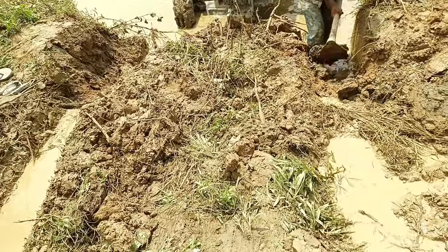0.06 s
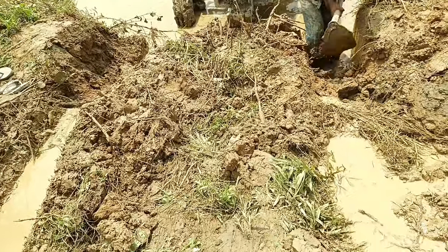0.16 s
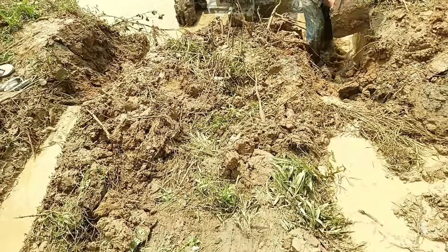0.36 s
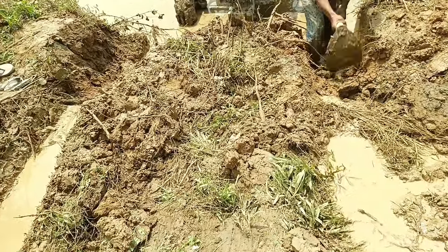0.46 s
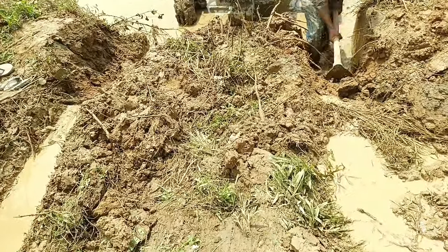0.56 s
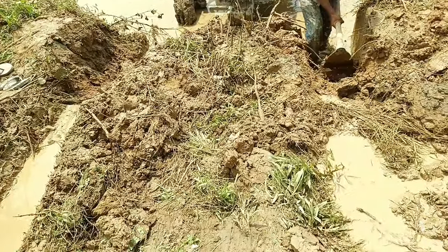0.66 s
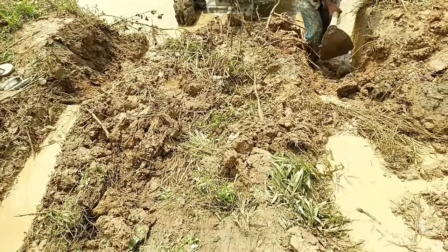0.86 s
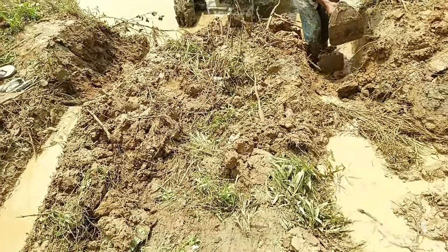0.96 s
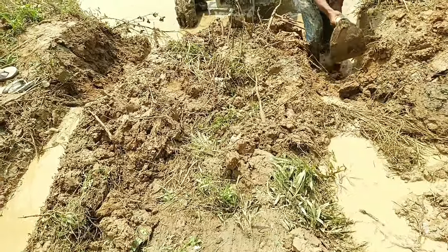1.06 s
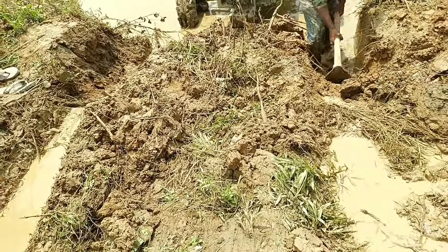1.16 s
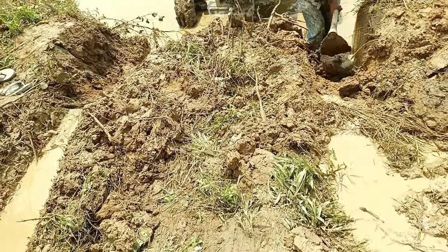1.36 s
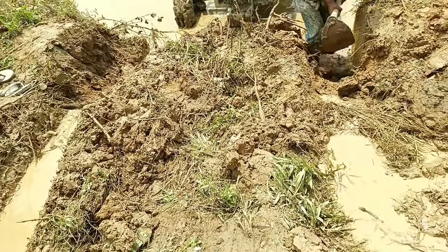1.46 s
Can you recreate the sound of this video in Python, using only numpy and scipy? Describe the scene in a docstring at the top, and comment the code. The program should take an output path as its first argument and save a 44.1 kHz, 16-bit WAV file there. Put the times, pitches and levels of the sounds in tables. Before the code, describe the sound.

Wet mud digging outdoors, heard from a few metres in stereo: strong squelchy slaps and hollow plops early on, a short pause, then fizzing, dripping water and softer splashes fading to near silence.

```python
"""Spade in waterlogged mud

Open field, a few metres from a camera with two microphone ports. Wet slaps are noise bursts with spray;
air pockets plop as damped sines that bend in pitch. Running water gurgles and fizzes as crowds of tiny
bubbles over washes of noise. A faint hush and rumble of filtered noise lie beneath.
The ports colour and place the near sounds by level, phase and short echoes."""
import sys
import numpy as np
from scipy import signal
from scipy.fft import rfft, irfft, next_fast_len
from scipy.io import wavfile

SR = 44100
rng = np.random.default_rng(int(sys.argv[2]) if len(sys.argv) > 2 else 0)


def digitize_waveform(pressure):
    """Quantize a signal to 16-bit integers and store it at the path in sys.argv[1].

    Rows of a 2-D input are taken as channels; values are limited to [-1, 1].
    """
    field = np.atleast_2d(pressure).T
    bounded = np.clip(field, -1, 1)
    quanta = np.round(bounded * 32767).astype(np.int16)
    wavfile.write(sys.argv[1], SR, quanta)


def nominal_scale(level):
    """Amplitude ratio for a level in decibels (scalar or array-like)."""
    x = np.asarray(level, float) / 20
    return 10 ** x


N = 66150  # samples, 1.5 s


def unit(x):
    """Scaled to rms 1."""
    return x / np.sqrt(np.mean(x ** 2) + 1e-20)


def along(points, hz):
    """Curve through (f/Hz, value) points, straight on a log frequency axis."""
    f, v = np.transpose(points)
    return np.interp(np.log(hz + 1), np.log(f + 1), v)


def filtered(x, response):
    """x times a complex response of frequency."""
    m = next_fast_len(x.shape[-1] + 8192)
    spectrum = rfft(x, m) * response(np.fft.rfftfreq(m, 1 / SR))
    return irfft(spectrum, m)[..., :x.shape[-1]]


def tone(spectrum, hz):
    """Gain of a spectrum, falling steeply under its first point."""
    return nominal_scale(along(spectrum, hz)) * np.minimum(hz / spectrum[0][0], 1) ** 4


def coloured(x, spectrum):
    """x through a spectrum, at rms 1."""
    return unit(filtered(x, lambda hz: tone(spectrum, hz)))


def levels(rows):
    """One gain per sample for each dB column after the time."""
    s, *columns = np.transpose(rows)
    t = np.arange(N) / SR
    return [nominal_scale(np.interp(t, s, column)) for column in columns]


# Spectrum of the distant field noise: f/Hz, relative level/dB
HUSH_SPECTRUM = [(180, -38), (300, -5), (556, 5), (1010, -9), (1440, -22), (1610, -27), (2070, -34),
                 (2940, 14), (4850, -29), (6230, -20), (7360, -1), (11900, -19), (16100, -35)]
# Spectrum of the low rumble: f/Hz, relative level per Hz/dB
RUMBLE_SPECTRUM = [(12, -60), (20, -38), (32, -15), (80, 2), (134, 3.5), (282, -4), (400, -13), (520, -20),
                   (880, -120)]
HUSH_DB, RUMBLE_DB = -84, -77  # rms level


def hush():
    """Distant field noise and a low rumble: noise partly shared by both ports, so partly coherent."""
    field, low = rng.standard_normal((2, 3, N))
    far = coloured(field[:2] + .9 * field[2], HUSH_SPECTRUM)
    rumble = coloured(low[:2] + 2.8 * low[2], RUMBLE_SPECTRUM)
    return nominal_scale(HUSH_DB) * far + nominal_scale(RUMBLE_DB) * rumble


def bubbles(start_s, hz, cycles, gain, rise, attack, size):
    """Damped sines that swell softly and bend in pitch, one for each row, summed into place."""
    start_s, hz, cycles, gain = (np.asarray(v)[:, None] for v in (start_s, hz, cycles, gain))
    k = np.arange(size)
    age = k / SR * hz / np.maximum(cycles, .3)  # 1 where the decay has reached 1/e
    turns = age * cycles * (1 + rise * np.minimum(age, 2) / 2)
    swell = (1 - np.exp(-age / attack)) ** 2
    rows = gain * np.sin(2 * np.pi * turns) * np.exp(-age) * swell
    rows = rows * np.cos(np.pi * k / size / 2)  # to silence at the last sample
    at = (np.round(start_s * SR).astype(int) + k).ravel()
    return np.bincount(at, rows.ravel(), N + size + SR)[:N]


def grains(spectrum, low_hz, high_hz, cycles, spread_db, wash_db, count, size):
    """Random bubbles of unequal size over a wash of noise, evened out and coloured."""
    u = rng.random((count, 4))
    hz = low_hz * (high_hz / low_hz) ** u[:, 1]
    gain = nominal_scale(-spread_db * np.log(1 - u[:, 2])) * np.sqrt(hz) * np.sign(u[:, 3] - .5)
    pops = bubbles(u[:, 0] * N / SR, hz, cycles * (.5 + u[:, 3]), gain, 0.22, 0.48, size=size)
    flat = unit(filtered(pops, lambda f: np.sqrt(f + low_hz)))
    wash = nominal_scale(wash_db) * rng.standard_normal(N)
    return coloured(flat + wash, spectrum)


# Sloshing in the cut, ahead of the ports: t/s, deep gurgle level/dB, light gurgle level/dB
SLOSH_LEVELS = [(0, -86, -91), (.1, -74.5, -93), (.2, -81, -88), (.235, -55, -45), (.29, -38.5, -40.5),
                (.365, -47, -48.5), (.385, -46.5, -49), (.43, -47.5, -55), (.475, -54, -54.5),
                (.51, -47, -37.5), (.55, -47, -66), (.62, -75, -74), (.79, -76, -80), (.82, -69, -54),
                (.88, -89, -62), (.94, -70, -59.5), (.975, -60, -57), (1.02, -66, -59.5),
                (1.06, -77, -55.5), (1.11, -95, -67.5), (1.125, -93, -48.5), (1.15, -62, -56),
                (1.19, -47, -45), (1.245, -58.5, -62), (1.30, -87.5, -83), (1.5, -80.5, -100)]
# Running water, ahead of the ports: t/s, fizz level/dB, spray level/dB
FLOW_LEVELS = [(0, -57.5, -78), (.07, -89, -82), (.125, -66.5, -65), (.145, -50.5, -75),
               (.21, -55.5, -56.5), (.255, -43, -53.5), (.30, -42, -48), (.37, -43, -67), (.40, -54, -50),
               (.435, -47, -74), (.472, -49, -63), (.51, -53, -63), (.56, -52.5, -70.5), (.64, -67, -72.5),
               (.69, -58.5, -72.5), (.80, -56.5, -61), (.84, -55, -64), (.90, -49.5, -61),
               (.96, -50.5, -57.5), (1.01, -44.5, -60), (1.07, -50.5, -58), (1.112, -60.5, -58),
               (1.14, -43, -64.5), (1.18, -45.5, -61), (1.23, -54, -70), (1.275, -61, -67),
               (1.33, -63.5, -78.5), (1.38, -75, -71.5), (1.5, -81.5, -74)]
# Spectra of deep gurgle, light gurgle, fizz and fine spray: f/Hz, relative level per Hz/dB
DEEP_SPECTRUM = [(59, -67), (100, 12), (228, -8), (306, -12), (379, -6), (650, -13), (840, -22),
                 (1430, -120)]
GURGLE_SPECTRUM = [(330, -31), (560, 6), (594, -14), (659, -2.5), (834, -3.5), (1160, -4), (1450, -22.5),
                   (1880, -34), (3190, -120)]
FIZZ_SPECTRUM = [(790, -13), (1350, -3.5), (1470, -9.5), (1590, -1), (1820, -2.5), (2010, -3), (2460, -1),
                 (2700, -6.5), (2950, 0.5), (3100, -1.5), (3430, -5.5), (3610, -12.5), (3960, -1.5),
                 (4320, -8), (6820, -14.5), (7600, -62), (9880, -7), (16700, -120)]
SPRAY_SPECTRUM = [(4120, -14.5), (7000, 2), (7580, -10.5), (8220, -8), (8810, -11.5), (9950, -20),
                  (11200, -5.5), (12700, -10.5), (13800, -12), (15200, -8), (16100, -10)]


def flow():
    """Water running through the cut: bubbles ring in two sizes of gurgle, in fizz and in fine spray."""
    deep_gain, light_gain = levels(SLOSH_LEVELS)
    fizz_gain, spray_gain = levels(FLOW_LEVELS)
    deep = grains(DEEP_SPECTRUM, 159.4, 633, cycles=2.5, spread_db=-1.0, wash_db=-6, count=500, size=900)
    light = grains(GURGLE_SPECTRUM, 547.5, 1354, cycles=2.31, spread_db=2.0, wash_db=3, count=900, size=500)
    fizz = grains(FIZZ_SPECTRUM, 1266, 7800, cycles=2.19, spread_db=3, wash_db=-2.5, count=5000, size=260)
    spray = grains(SPRAY_SPECTRUM, 7500, 16000, cycles=2.5, spread_db=2.0, wash_db=2, count=9000, size=60)
    return deep_gain * deep + light_gain * light + fizz_gain * fizz + spray_gain * spray


# Wet slaps and drips: t/s, relative body level/dB, centre f/Hz, relative spray level/dB,
# time for the body to fall 60 dB/s, rise/s
SLAP_EVENTS = [(0.0004, -43.5, 2720, -77.5, 0.15, 0.0032), (0.085, -54.5, 3150, -72, 0.075, 0.0028),
               (0.1128, -52.5, 3820, -70, 0.059, 0.0026), (0.1338, -36.5, 6100, -43.5, 0.062, 0.003),
               (0.1442, -40.5, 2850, -48.5, 0.075, 0.0024), (0.1548, -37.5, 1670, -51.5, 0.065, 0.004),
               (0.1734, -31, 3430, -54, 0.11, 0.0021), (0.2205, -36.5, 1640, -52, 0.12, 0.0037),
               (0.2667, -23.5, 1830, -44, 0.041, 0.0035), (0.2838, -22, 3390, -41.5, 0.083, 0.0027),
               (0.3441, -34, 3000, -50, 0.18, 0.0042), (0.4204, -30, 2070, -64, 0.2, 0.0023),
               (0.4324, -51, 2160, -55, 0.071, 0.001), (0.44, -20, 1760, -43.5, 0.048, 0.0021),
               (0.4785, -25, 3720, -52.5, 0.057, 0.0028), (0.4915, -30, 2870, -57, 0.051, 0.0017),
               (0.498, -24, 1860, -54.5, 0.079, 0.0038), (0.5638, -44, 2000, -59, 0.065, 0.0019),
               (0.6599, -45, 1800, -91, 0.2, 0.0025), (0.6995, -50, 3050, -59.5, 0.053, 0.0016),
               (0.7292, -45.5, 2420, -62, 0.065, 0.0023), (0.7436, -36, 2900, -55.5, 0.071, 0.0019),
               (0.7786, -38.5, 3170, -54.5, 0.035, 0.0021), (0.809, -26.5, 1770, -50.5, 0.086, 0.0038),
               (0.8598, -35.5, 3070, -46.5, 0.084, 0.0029), (0.9114, -37.5, 2000, -52, 0.065, 0.0034),
               (0.9678, -31, 1710, -57, 0.056, 0.0025), (0.9785, -29.5, 2950, -47.5, 0.065, 0.003),
               (0.9957, -29.5, 3280, -50.5, 0.044, 0.0039), (1.047, -26.5, 1972, -41.5, 0.031, 0.0013),
               (1.1463, -30, 1806, -45.5, 0.046, 0.0012), (1.1674, -37, 2200, -61, 0.095, 0.0027),
               (1.2171, -33, 2870, -77, 0.036, 0.002), (1.2437, -48, 3270, -54.5, 0.05, 0.0019),
               (1.29, -40, 3780, -60, 0.091, 0.0022), (1.3006, -46.5, 2010, -59.5, 0.091, 0.0019),
               (1.3154, -44, 1640, -67.5, 0.091, 0.003), (1.3526, -55, 1790, -65.5, 0.065, 0.0035),
               (1.406, -64, 1630, -81, 0.058, 0.0035), (1.4226, -93, 2990, -76, 0.057, 0.003),
               (1.4366, -66, 6330, -59.5, 0.065, 0.0021), (1.47, -63, 6870, -67, 0.065, 0.003),
               (1.4825, -61.5, 7000, -64, 0.091, 0.0038)]
SLAP_WIDTH_OCT, SLAP_PEAK_DB = 0.43, 10  # hump over the fizz spectrum round the centre
SPRAY_T60_SHARE = 0.64  # of the body's decay time
CRACK_DB, CRACK_T60_S = -0.5, 0.0053  # first contact, added on the tail and relative to it


def slaps():
    """A burst of noise round its own centre and a puff of spray: a crack, then a fast tail."""
    out, t = np.zeros(N + SR), np.arange(SR // 5) / SR
    for s, db, centre_hz, spray_db, t60, rise_s in SLAP_EVENTS:
        body_noise, spray_noise = rng.standard_normal((2, len(t)))

        def bump(f):
            octaves = np.log2((f + 1) / centre_hz)
            hump_db = SLAP_PEAK_DB * np.exp(-(octaves / SLAP_WIDTH_OCT) ** 2)
            return tone(FIZZ_SPECTRUM, f) * nominal_scale(hump_db)

        late = np.maximum(t - rise_s, 0)
        rise = np.minimum(t / max(rise_s, 1 / SR), 1) ** 2
        crack = 1 + nominal_scale(CRACK_DB - 60 * late / CRACK_T60_S)
        body = nominal_scale(db - 11.5 - 60 * late / t60) * unit(filtered(body_noise, bump))
        puff_gain = nominal_scale(spray_db - 60 * late / (t60 * SPRAY_T60_SHARE))
        puff = puff_gain * coloured(spray_noise, SPRAY_SPECTRUM)
        out[round(s * SR):][:len(t)] += rise * crack * (body + puff)
    return out[:N]


# Air pockets that collapse in the mud: t/s, relative level/dB, f/Hz,
# cycles for the ringing to decay by 20 dB, share of pitch gained per 1/e decay time
PLOP_EVENTS = [(.100, -60.5, 590, 36, 0.047), (.136, -57, 865, 2.2, .05), (.156, -38, 1310, 2.4, 0.098),
               (0.23, -31, 790, 6.2, -0.025), (.236, -25, 560, 4, -0.068),
               (0.2662, -16.5, 397, 1.65, 0.0054), (0.3016, -16.5, 443, 2, 0.011),
               (0.3117, -22, 414, 3.7, -0.06), (.329, -29.5, 500, 3.4, -0.081), (0.333, -37, 470, 6, 0.07),
               (.345, -29, 493, 4.1, 0.027), (.348, -29.5, 411, 5.8, -0.083),
               (.361, -28, 457, 1.7, -0.0056), (.402, -37.5, 393, 7.4, 0.072),
               (0.441, -22.5, 440, 2.6, -0.083), (0.443, -28.5, 239, 3.6, -0.0032),
               (0.493, -26.5, 492, 2.3, 0.018), (.497, -22, 223.4, 2.3, -0.002), (0.503, -36, 99, 2.1, .05),
               (.503, -32.5, 1114, 6.5, .05), (.507, -42, 824, 6.4, 0.12), (0.539, -38.5, 356, 3.9, 0.016),
               (0.556, -41, 400, 7, 0.084), (0.576, -48, 1150, 6.6, .05), (0.605, -52.5, 1300, 16, -0.0077),
               (.585, -58, 730, 71, -.06), (0.698, -48.5, 804, 15.2, 0.0047),
               (0.688, -56, 1155, 22, 0.0027), (.812, -50, 434, 9.4, 0.077), (.845, -42.5, 1085, 30, 0.027),
               (.911, -50, 607, 10, 0.032), (.952, -41.5, 874, 4.9, .05), (0.97, -32.5, 400, 2.6, -0.028),
               (1.011, -41, 890, 7.2, 0.04), (1.038, -48.5, 503.5, 21.4, -0.022),
               (1.056, -40.5, 562, 6.4, 0.019), (1.118, -34, 800, 4, -0.025),
               (1.124, -30.5, 980, 4.7, 0.012), (1.123, -40, 1310, 3.5, 0.11),
               (1.128, -42.5, 544, 5.7, 0.1), (1.164, -39, 433, 7.5, 0.036), (1.175, -43.5, 403, 8.4, 0.1),
               (1.1976, -34.5, 437, 2.1, 0.042), (1.214, -39.5, 239, 2.3, 0.027),
               (1.236, -49, 330, 5.4, -0.067)]
PLOP_SWELL = 0.52  # swell time over 1/e decay time
PLOP_DB, OVERTONE_DB = 7, -8  # gain on every pocket; overtone over fundamental


def plops():
    """Each pocket swells and rings for a few cycles or more, with a weak overtone."""
    s, db, hz, cycles, climb = np.transpose(PLOP_EVENTS)
    out = np.zeros(N)
    for ratio, extra_db in [(1, 0.0042), (2.3, OVERTONE_DB)]:
        gain = nominal_scale(db + PLOP_DB + extra_db)
        out += bubbles(s, hz * ratio, cycles / np.log(10), gain, climb[:, None], PLOP_SWELL, size=5000)
    return out


# Left port over right port: f/Hz, level/dB
PORT_BALANCE = [(60, 1), (200, .5), (400, 0.5), (800, 4), (1300, -6.5), (1800, -0.5), (2400, 4.5),
                (3500, 3.5), (5000, -3), (7200, -11), (8500, 1), (10400, 11), (12500, 11.5), (15000, 5)]
# Phase of the left port ahead of the right: f/Hz, phase/rad
PORT_PHASE = [(0, 0.5), (2150, 0.05), (2580, 0.56), (3010, -6), (3700, -6), (4220, -2.5), (5770, -16),
              (6370, -12), (7580, -17), (8960, -20.5), (10900, -39), (12800, -46), (14400, -33),
              (16300, -50.5)]
# Bank and ground echoes over the direct sound: f/Hz, level/dB
ECHO_LEVELS = [(100, -34), (500, -22.5), (1100, -8), (1700, -3.5), (2600, -3.5), (4000, 0.5), (8000, 3.5),
               (15000, -5)]
ECHO_T60_S = 0.051
LOW_CUT_HZ, MOVE_S = 226, 1 / 100  # small sources give no bass; time until the sound comes from a new spot


def ports(x):
    """Direct sound reaches the ports with a phase lag; short echoes differ by port and as the source moves."""
    hop, t = round(MOVE_S * SR), np.arange(SR // 16) / SR
    starts = np.arange(-hop, N, hop)
    k = np.arange(2 * hop)
    # overlapping pieces, each rung by its own pair of noise tails
    pieces = np.pad(x, 2 * hop)[starts[:, None] + 2 * hop + k] * np.sin(np.pi * k / hop / 2)
    tail = rng.standard_normal((2, len(starts), len(t))) * nominal_scale(-60 * t / ECHO_T60_S)
    tail = tail / np.linalg.norm(tail, axis=2)[..., None]
    rung = signal.fftconvolve(pieces[None], tail, axes=2)
    at = (starts[:, None] + hop + np.arange(rung.shape[2])).ravel()
    echo = np.array([np.bincount(at, r.ravel())[hop:hop + N] for r in rung])
    half = np.array([[.5], [-.5]])  # left, right

    def wet(f):
        return nominal_scale(along(ECHO_LEVELS, f))

    def gain(f):
        balance_db = along(PORT_BALANCE, f)
        port = nominal_scale(half * balance_db) / np.cosh(balance_db * np.log(10) / 40)  # the two always add up to 2
        low_cut = 1 / np.sqrt(1 + (LOW_CUT_HZ / (f + 1)) ** 6)
        return port * low_cut / np.sqrt(1 + wet(f) ** 2)

    phase_hz, phase = np.transpose(PORT_PHASE)
    direct = filtered(x, lambda f: gain(f) * np.exp(1j * half * np.interp(f, phase_hz, phase)))
    return direct + filtered(echo, lambda f: gain(f) * wet(f))


def scene():
    """Mud and water through the ports, over the hush."""
    return ports(flow() + plops() + slaps()) + hush()


def low_pass(x):
    """Removes everything above the highest recorded frequency."""
    return signal.sosfilt(signal.butter(12, 16670, fs=SR, output="sos"), x)


def record(dry):
    """The camera's band limit: nothing from 16100 Hz up passes."""
    mix = filtered(dry, lambda hz: hz < 16100)
    return low_pass(mix)


dry = scene()
out = record(dry)
digitize_waveform(out)
```